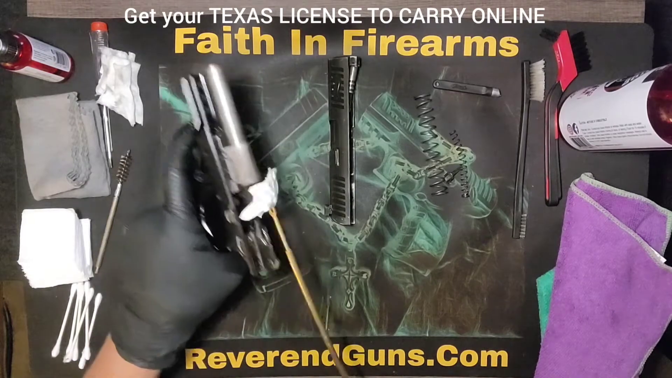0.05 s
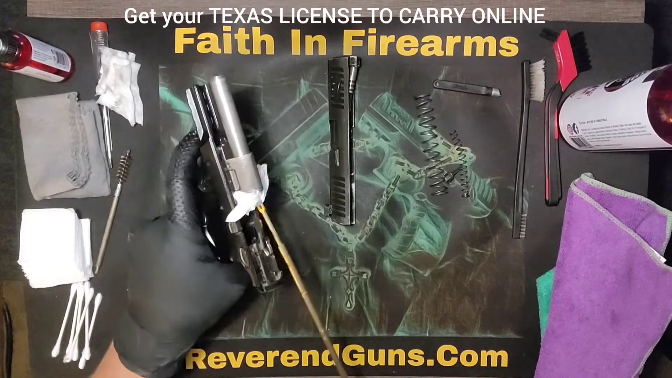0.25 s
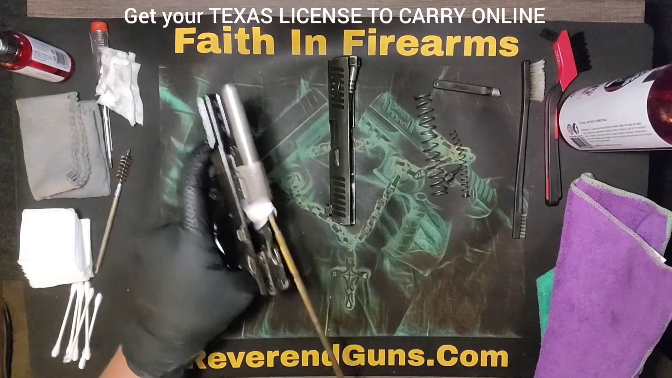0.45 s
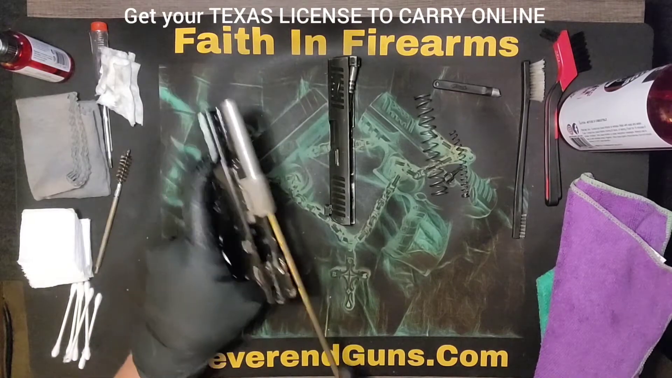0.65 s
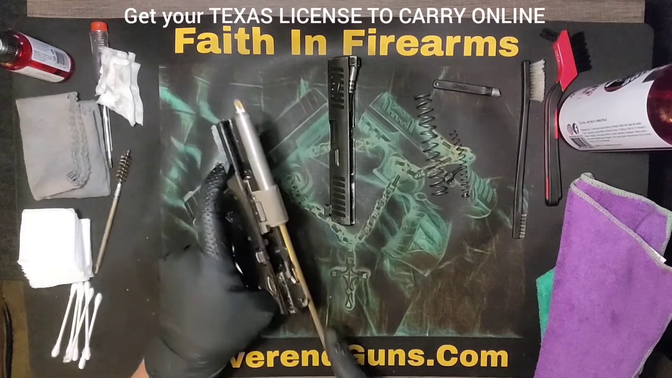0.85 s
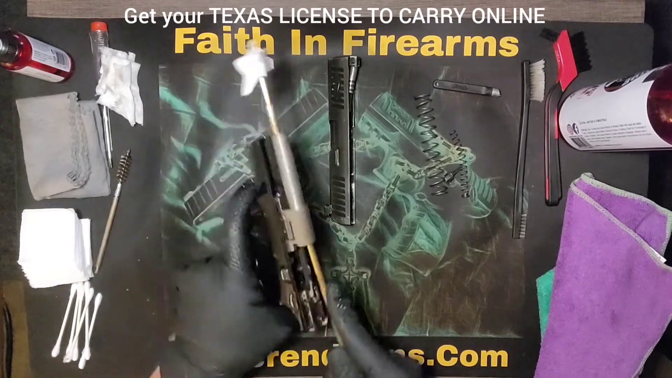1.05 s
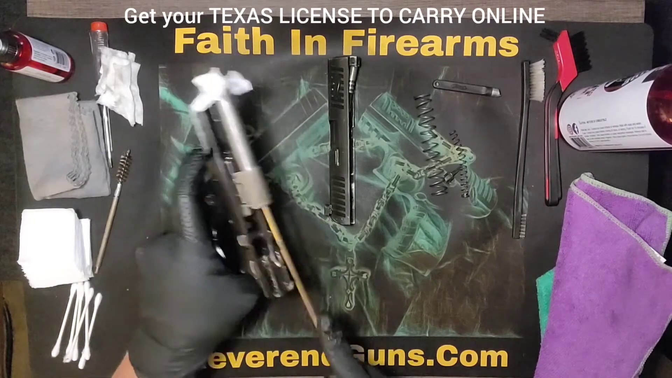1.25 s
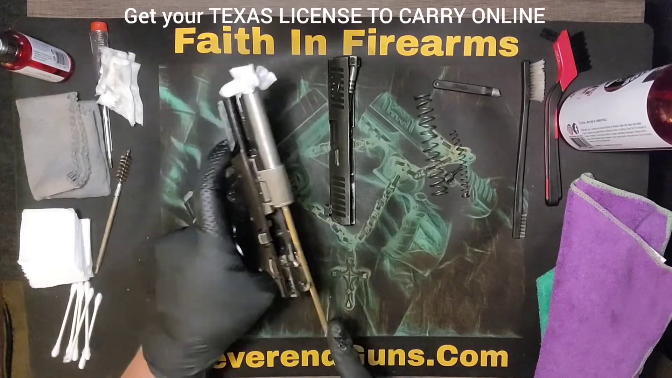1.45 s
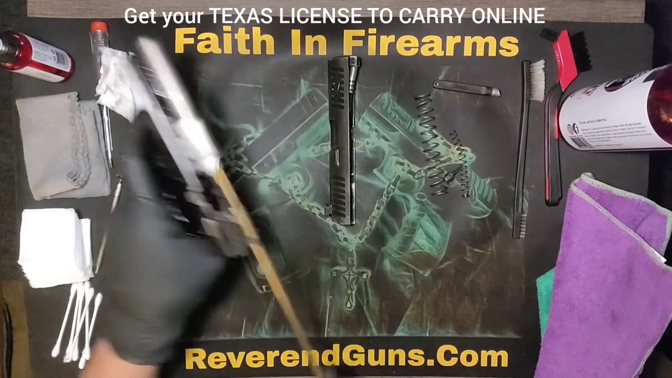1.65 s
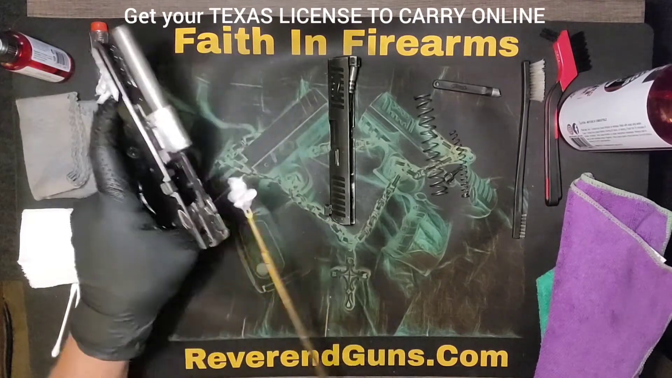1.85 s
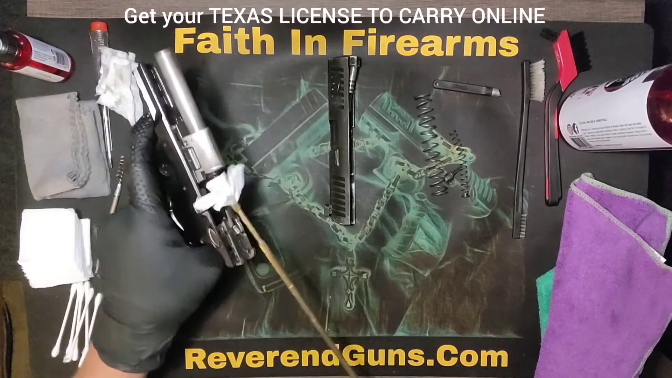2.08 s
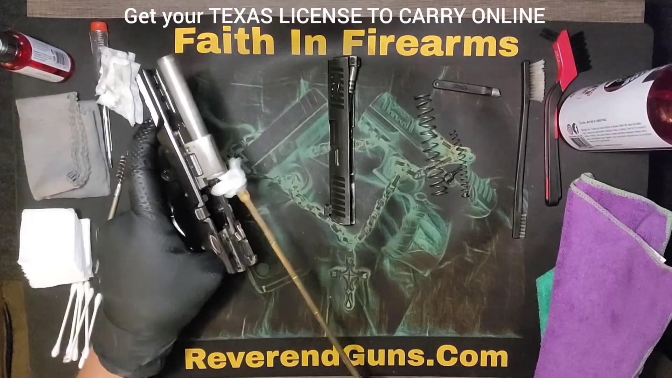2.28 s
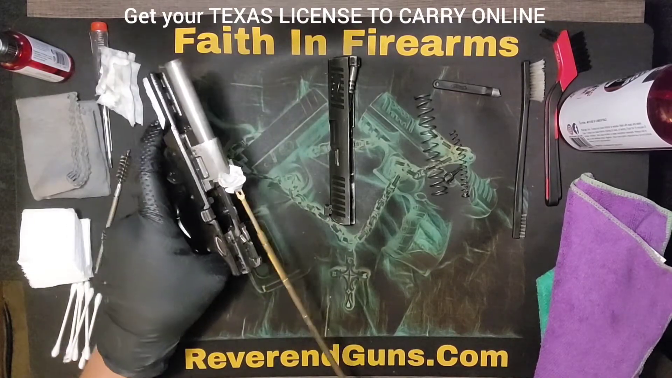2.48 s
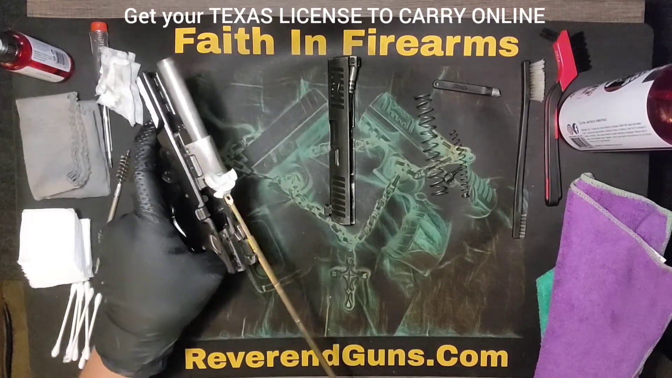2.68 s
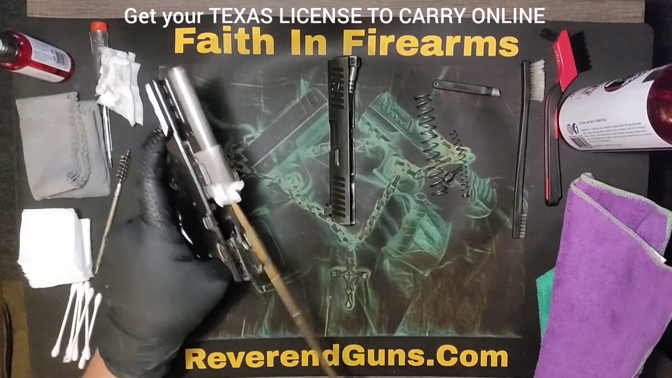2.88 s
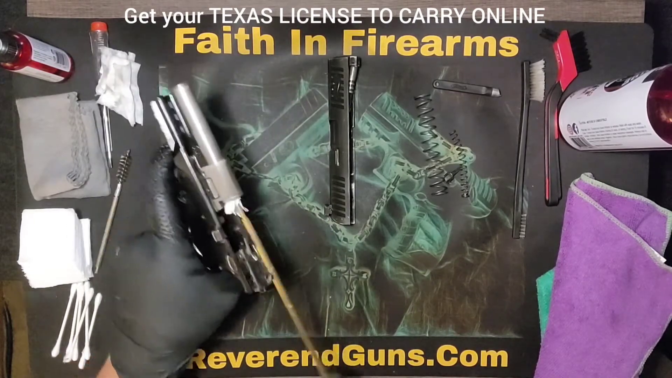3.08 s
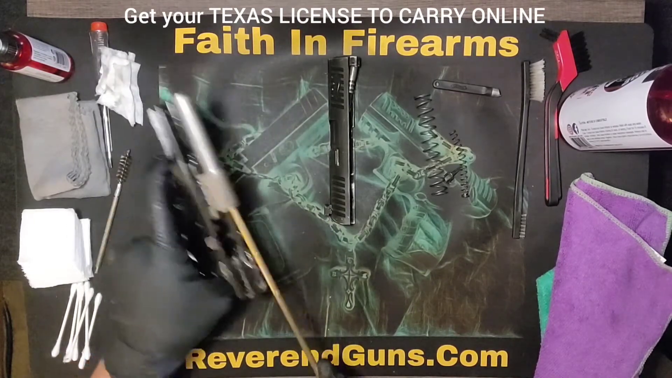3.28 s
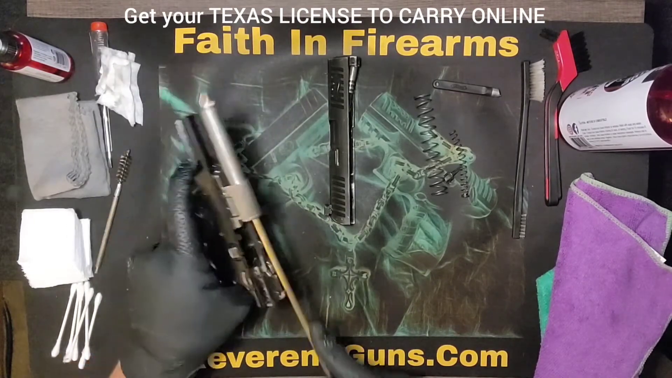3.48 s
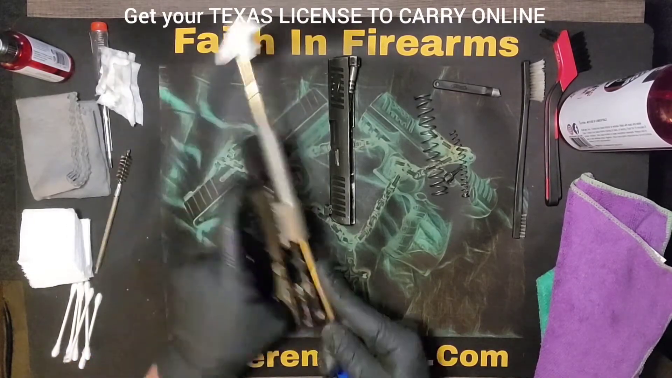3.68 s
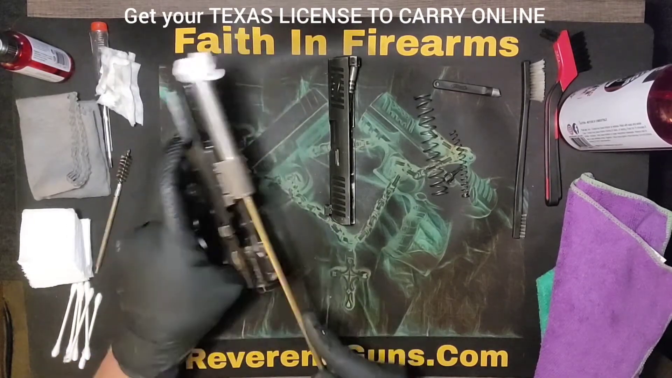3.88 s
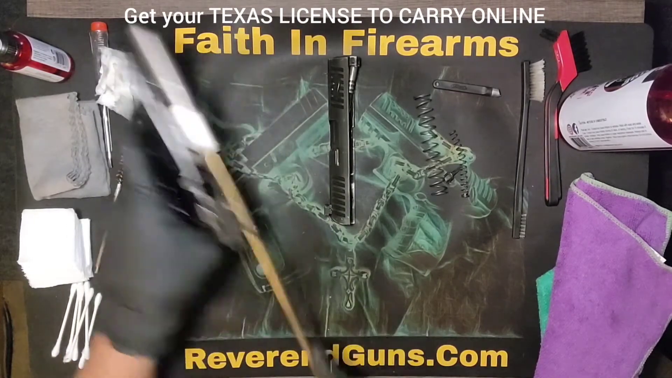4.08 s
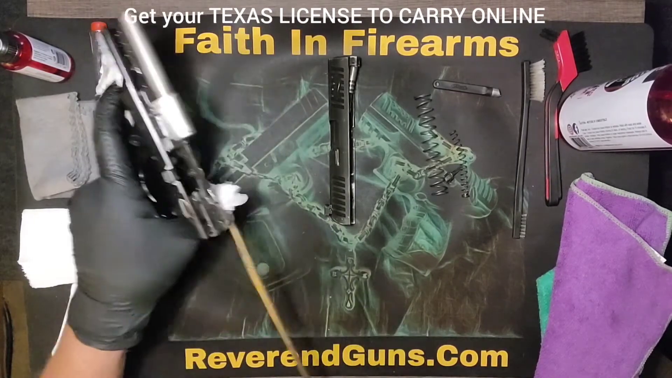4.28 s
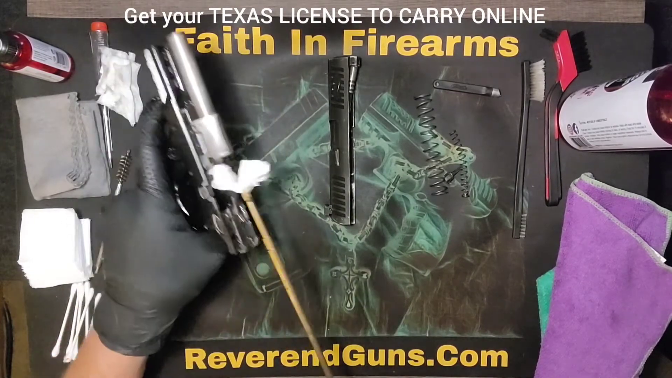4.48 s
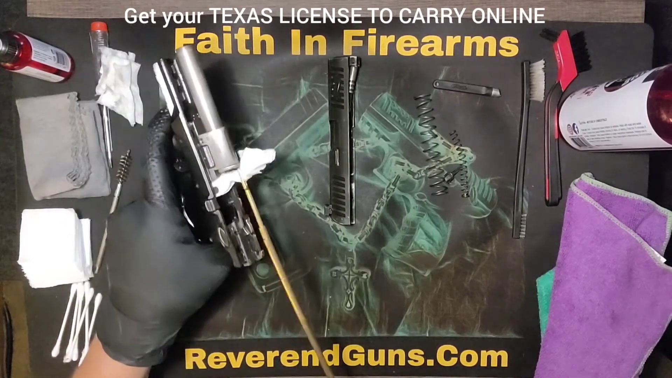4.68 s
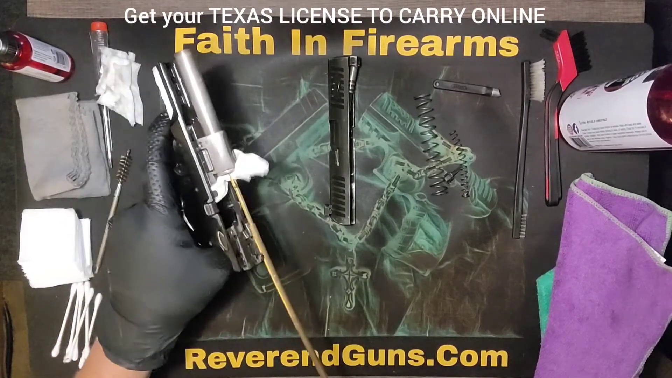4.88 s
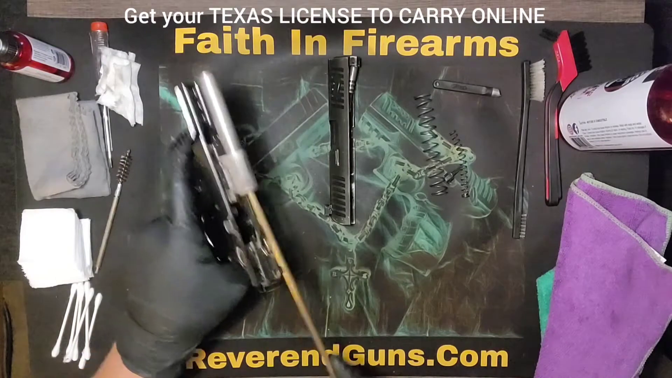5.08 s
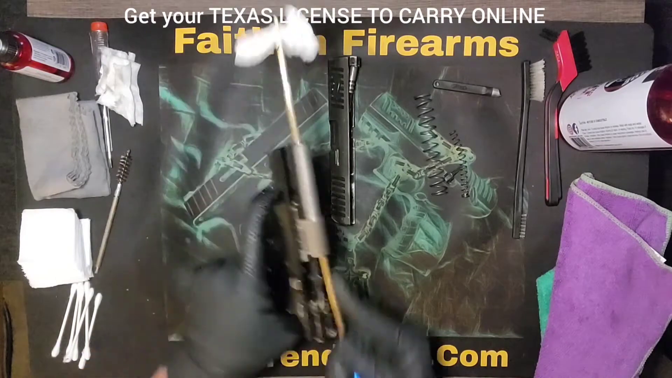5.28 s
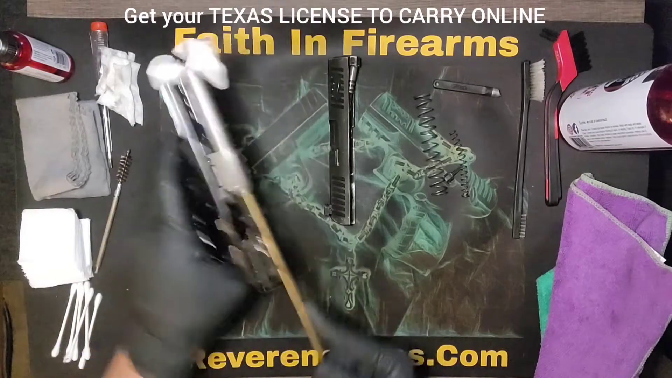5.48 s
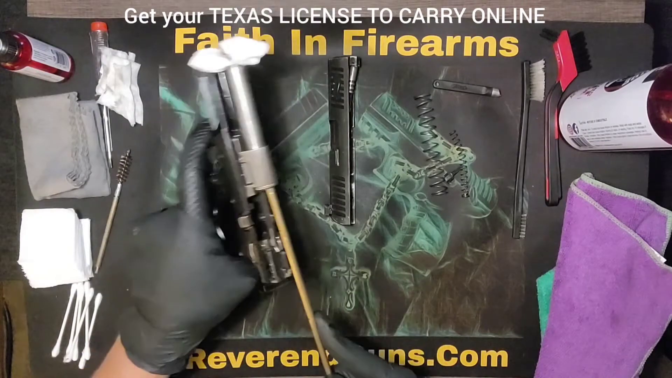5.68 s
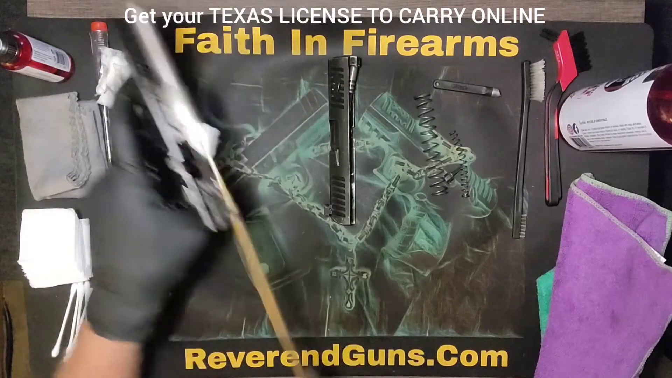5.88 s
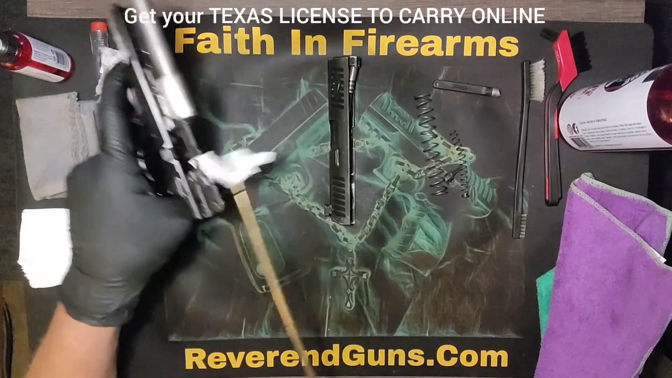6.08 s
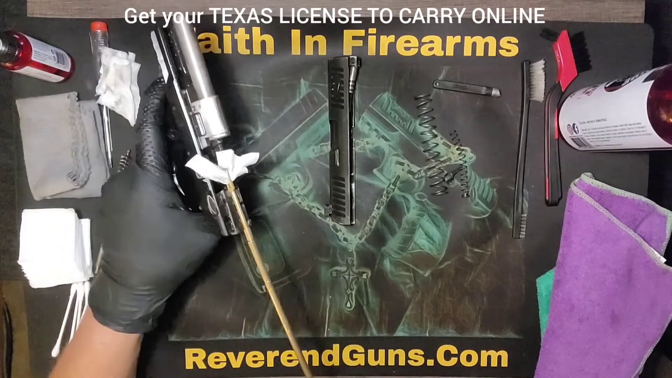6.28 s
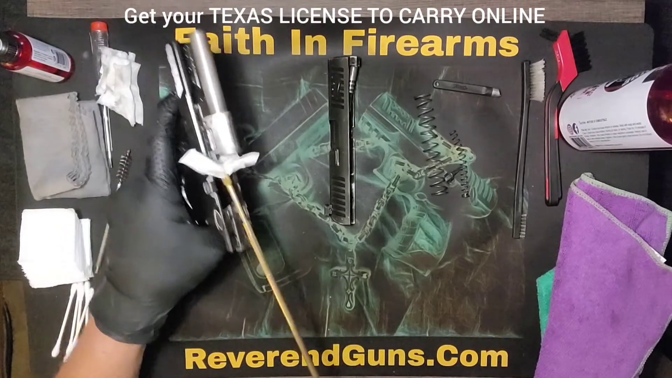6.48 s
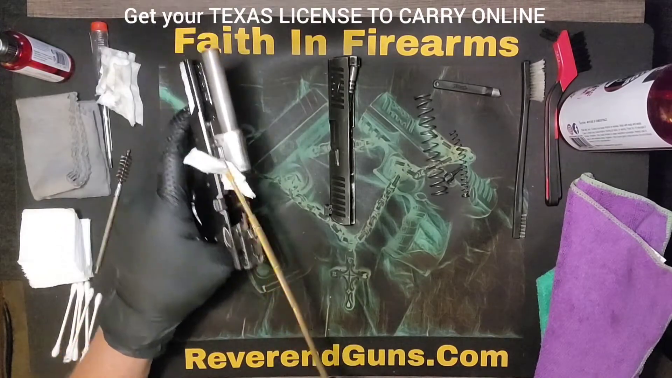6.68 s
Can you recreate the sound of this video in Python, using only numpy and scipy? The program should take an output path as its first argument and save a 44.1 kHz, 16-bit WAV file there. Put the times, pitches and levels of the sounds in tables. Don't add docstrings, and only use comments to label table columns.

```python
import sys
import numpy as np
from scipy import signal
from scipy.fft import rfft, irfft, next_fast_len
from scipy.io import wavfile
from scipy.ndimage import map_coordinates

SR = 44100
rng = np.random.default_rng(int(sys.argv[2]) if len(sys.argv) > 2 else 0)


def natural_amplitude(level_db):
    exponent = np.asarray(level_db, float) / 20
    return 10 ** exponent


def file_out(sig):
    cols = np.atleast_2d(sig).T
    lim = np.clip(cols, -1, 1)
    pcm = np.round(lim * 32767).astype(np.int16)
    wavfile.write(sys.argv[1], SR, pcm)


N = 297234

# [f/Hz, level/dB]
STEEL_MODES = [(800, -24), (1150, -30), (1500, -10), (1940, -0.5), (2300, -8.5), (2740, 1), (3100, 1),
               (3450, 3.5), (3770, 1), (4200, -2.5), (4450, -7), (4750, -9.5)]
# [f/Hz, level/dB]
ROD_MODES = [(5200, -18.5), (5640, -9.5), (6080, -10.5), (6880, -9.5), (7770, -10.5), (8800, -20)]
# [f/Hz, level/dB]
CLOTH_MODES = [(10200, -16.5), (12000, -6.5), (12900, 1.5), (14200, -2), (15300, -11.5)]
SHARPNESS = (18, 16, 12)


def unit(x):
    return x / np.sqrt(np.mean(x ** 2) + 1e-20)


def along(points, hz):
    f, v = np.transpose(points)
    return np.interp(np.log(hz + 1), np.log(f + 1), v)


def wobble(rate):
    steps = np.arange(0, N * rate / SR + 1, 1 / 8)
    knots = rng.standard_normal(int(N * rate / SR) + 4)
    curve = map_coordinates(knots, [steps])
    return np.interp(np.arange(N) * rate / SR, steps, curve)


def filtered(x, response):
    n = x.shape[-1]
    m = next_fast_len(n + 1024)
    return irfft(rfft(x, m) * response(np.fft.rfftfreq(m, 1 / SR)), m)[..., :n]


def rush(spectrum):
    # [f/Hz, left-right likeness]
    likeness = [(60, .9), (150, .9), (280, .45), (640, 0), (7000, .2), (15000, .6)]
    turn = lambda hz: np.arccos(np.clip(along(likeness, hz), -1, 1)) / 2
    shape = lambda hz: natural_amplitude(along(spectrum, hz)) * [np.cos(turn(hz)), np.sin(turn(hz))]
    mid, side = filtered(rng.standard_normal((2, N)), shape)
    return unit(np.array([mid + side, mid - side]))


def background():
    # [f/Hz, rms level/dB, unsteadiness/dB]
    hum_lines = [(18, -75, 3), (29.2, -60, .4), (58, -75, 3.5), (77.6, -69, 1.6), (119.8, -70, 1.3),
                 (178, -86, 3), (238, -89, 2), (296, -94, 2), (358, -95, 2)]
    # [f/Hz, level per Hz/dB]
    rumble = [(12, -18.5), (22, -6), (50, -3.5), (100, -4.5), (170, -13), (260, -20.5), (450, -23),
              (800, -22), (1100, -33)]
    # [f/Hz, level per Hz/dB]
    far_hiss = [(590, -33.5), (1000, -9), (1250, -2), (1860, -3), (2020, 0.5), (2870, 1.5), (3350, -2.5),
                (4380, -8.5), (8260, -22.5), (15200, -15), (16500, -23.5)]
    t = np.arange(N) / SR
    hum = 0
    for hz, db, shake_db in hum_lines:
        strength = np.sqrt(2) * natural_amplitude(db + shake_db * wobble(4.8))
        port_phase = [[0], [.35]]
        phase = 2 * np.pi * hz * t + 0.47 * shake_db * wobble(2.4) + port_phase
        hum = hum + strength * np.sin(phase)
    hum = hum * natural_amplitude([[-.4], [.4]])
    return hum + natural_amplitude(-70.5) * rush(rumble + [(1600, -74.5)]) + natural_amplitude(-81) * rush(far_hiss)


def damped(hz, sharpness):
    return sharpness * min(1, (hz / 1900) ** 2)


def resonance(x, hz, db, sharpness):
    sharp = signal.iirpeak(hz, sharpness, SR)
    wide = signal.iirpeak(hz, sharpness / 4, SR)
    return natural_amplitude(db) * signal.lfilter(*wide, signal.lfilter(*sharp, x))


def stroke():
    # [t/s, steel level/dB, time to lose 30 dB/s, spot f/Hz, rod over steel/dB]
    jolts = [(.678, -48.5, 0.0572, 3400, -6.5), (.996, -48, 0.1477, 2805, -7.5),
             (1.466, -57, 0.1142, 4144, -3.5), (3.47, -63, 0.98, 2100, -17.5),
             (4.998, -57.5, 0.11, 2001, -8), (3.7, -52, 0.1655, 3695, -15.5),
             (4.033, -41.5, 0.0345, 4297, -3.5), (3.22, -59.5, 0.15, 3523, -10),
             (3.302, -41, 0.1413, 4121, -18.5), (3.566, -39.5, 0.1005, 4060, -2),
             (4.055, -34, 0.0217, 4130, 7.5), (4.098, -28.5, 0.0325, 3450, -9.5),
             (4.182, -43, 0.017, 3693, -7.5), (4.694, -49, 0.0991, 3880, -11),
             (5.152, -49.5, 0.2553, 4028, -9.5), (5.24, -38, 0.0405, 2982, -12),
             (5.372, -43, 0.0159, 2677, -18.5), (5.719, -56.5, 0.0655, 3983, -12.5),
             (5.785, -32, 0.0825, 4080, -5.5), (6.26, -59.5, 0.0316, 2582, -7),
             (6.374, -68, 0.13, 3189, -8), (6.486, -66, 0.0021, 2649, -3)]
    # [middle t/s, steel level/dB, time to lose 30 dB/s, spot f/Hz, rod over steel/dB]
    slides = [(.78, -68, 0.18, 1950, -16.5), (.975, -51.5, 0.0788, 2600, -10),
              (1.145, -44.5, 0.06, 3000, -13), (1.205, -43, 0.0429, 2705, -12),
              (1.595, -42.5, 0.0722, 4291, -8.5), (1.66, -42.5, 0.1105, 4268, -16),
              (2.45, -75, 0.0033, 3858, -13.5), (2.65, -76.5, 0.1, 3850, -14),
              (3.545, -44.5, 0.023, 3011, -8.5), (3.64, -57, 0.0672, 3892, -12),
              (3.785, -42, 0.0997, 2972, -20.5), (1.11, -50, 0.0338, 2300, -20.5),
              (4.04, -53, 0.0382, 3488, -8), (4.13, -47, 0.1128, 3882, -12), (4.44, -74, 0.27, 3863, -16),
              (4.775, -62.5, 0.0943, 3601, -15.5), (5.185, -38, 0.0276, 3303, -19.5),
              (5.29, -43, 0.0427, 4311, -14), (5.44, -40, 0.078, 2522, -13.5),
              (5.494, -41.5, 0.0555, 2705, -18), (5.6, -69.5, -0.04, 2721, -17),
              (5.89, -45, 0.0896, 3800, -9), (6.415, -62.5, 0.05, 2733, -18.5),
              (6.595, -65, 0.0678, 2670, -21)]
    # [middle t/s, cloth level/dB, time to lose 30 dB/s, spot f/Hz]
    brushes = [(.465, -67.5, 0.0751, 2000), (.655, -66, 0.0938, 3000), (1.011, -52, 0.0283, 2840),
               (1.189, -48, 0.0143, 2690), (2.897, -72, 0.03, 5188), (3.035, -63, 0.0484, 5300),
               (3.235, -70, 0.0176, 3530), (3.54, -58, -0.0086, 3700), (3.57, -46, 0.0156, 4044),
               (3.76, -55, 0.0251, 3107), (4.032, -58.5, 0.0172, 4300), (5.0, -62.5, 0.075, 1999),
               (5.09, -70.5, 0.1418, 5200), (5.237, -38, 0.0035, 2975), (5.446, -53, 0.0429, 2517),
               (5.768, -63.5, -0.0351, 2733), (6.4, -72, -0.02, 2736), (6.49, -62.5, 0.0044, 2650),
               (6.67, -85, 0.14, 3600)]
    # [steel level/dB, rod level/dB, cloth level/dB]
    brush_parts_db = (-7.5, -4, -1.5)
    # [steel level/dB, rod level/dB, cloth level/dB]
    rest_parts_db = (-84.5, -93.5, -96)
    rise_s = .016
    cloth_equal_db, cloth_grows = -77.5, 0.723
    settle_s, settle_db = 0.22, (-28.5, -24, -22)
    t = np.arange(0, N / SR + .002, .001)

    def jolt(s, fall_s):
        return -30 * np.where(t < s, (s - t) / rise_s, (t - s) / fall_s)

    def swell(s, fall_s, order=2):
        return -30 * ((t - s) / fall_s) ** order

    def tight(db, rod_db):
        cloth_db = rod_db - (1 - cloth_grows) * (db + rod_db - cloth_equal_db)
        return 0, rod_db, cloth_db

    moves = [(db + jolt(s, fall), hz, tight(db, rod)) for s, db, fall, hz, rod in jolts]
    moves += [(db + swell(s, fall), hz, tight(db, rod)) for s, db, fall, hz, rod in slides]
    moves += [(db + swell(s, fall, order=4), hz, brush_parts_db) for s, db, fall, hz in brushes]
    moves += [(0 * t, 2750, rest_parts_db)]
    power = np.array([natural_amplitude(2 * (db + np.array(parts_db)[:, None])) for db, _, parts_db in moves])
    total = power.sum(0)
    spot_hz = np.exp(np.log([hz for _, hz, _ in moves]) @ power[:, 0] / total[0])
    memory = natural_amplitude(-60 * t[1] / settle_s)
    creep = natural_amplitude(2 * np.array(settle_db))[:, None] * signal.lfilter([1 - memory], [1, -memory], total)
    curves = (*10 * np.log10(total + creep), spot_hz)
    return [np.interp(np.arange(N) / SR, t, curve) for curve in curves]


def scrape():
    grip_drift = (3.5, 3, 2)
    clumping = (1.3, 1.1, .75)
    spot_lift = (9, 7, 0)
    *levels, spot_hz = stroke()
    clumps_db = 11 * np.tanh((2.1 * wobble(80) + 5 * wobble(700)) / 10)
    parts = zip((STEEL_MODES, ROD_MODES, CLOTH_MODES), levels, clumping, grip_drift, spot_lift, SHARPNESS)
    out = np.zeros((2, N))
    for modes, level_db, grainy, drift_db, focus_db, sharp in parts:
        common, other = rng.standard_normal((2, N))
        fibres = common + .4 * other * [[1], [-1]]
        fibres = natural_amplitude(grainy * clumps_db) * fibres
        layer = 0
        for hz, db in modes:
            nearness = np.exp(-(np.log(spot_hz / hz) / .07) ** 2)
            grip_db = drift_db * wobble(30) + focus_db * nearness
            layer = layer + resonance(natural_amplitude(grip_db) * fibres, hz, db, damped(hz, sharp))
        out += unit(layer) * natural_amplitude(level_db + 0.5)
    return out


def singing(rows, width_hz):
    out, t = np.zeros(N + SR), np.arange(SR // 6) / SR
    memory = np.exp(-np.pi * abs(width_hz) / SR)
    slow = np.convolve([1, -memory], [1, -memory])
    for s, length, from_hz, to_hz, db in rows:
        u = np.clip(t / max(length, .01), 0, 1)
        a, b = unit(signal.lfilter([1], slow, rng.standard_normal((2, len(t)))))
        phase = 2 * np.pi * np.cumsum(from_hz + (to_hz - from_hz) * u) / SR
        swell = np.sqrt(np.abs(np.sin(np.pi * u))) * (u < 1)
        out[round(s * SR):][:len(t)] += natural_amplitude(db) * swell * (a * np.cos(phase) + b * np.sin(phase))
    return out[:N]


def thuds():
    # [t/s, length/s, from f/Hz, to f/Hz, rms level/dB]
    bench_thuds = [
        (.42, 0.077, 310.5, 301, -78.5),
        (.665, 0.027, 603, 560, -74.5),
        (2.42, .1, 329.6, 309, -80.5),
        (3.29, 0.0692, 370, 330, -77),
        (4.045, .05, 300, 260, -77),
        (4.16, 0.0483, 340.3, 330, -77.5),
        (4.95, .12, 220, 220, -78),
        (5.775, .04, 330, 280, -79),
    ]
    return singing(bench_thuds, 90) * natural_amplitude([[.5], [-.5]])


def contacts():
    # [t/s, peak level/dB, f/Hz]
    notes_sung = [(.399, -57.5, 1487), (.96, -60.5, 961), (1.2, -52, 849), (1.642, -51, 797.3),
                  (3.025, -62, 5434), (3.803, -53, 826), (4.093, -46, 800), (4.177, -42, 1928),
                  (5.232, -35, 1976), (4.705, -53, 1954), (5.925, -46, 1994), (5.232, -48.5, 843),
                  (5.497, -56, 810), (5.776, -55, 799.5), (5.895, -55, 800), (1.105, -64.5, 928),
                  (3.33, -53.5, 1356)]
    # [t/s, peak level/dB, loudest f/Hz, edge/dB]
    ticks = [(0.421, -38, 2007, -8.5), (0.7374, -47.5, 2240, -11), (0.8673, -48, 4313, -27.5),
             (1.4544, -43.5, 6800, -16), (1.507, -45.5, 4010, -30.5), (2.4416, -60, 3810, -31),
             (2.569, -66, 3840, -25), (2.897, -63, 3000, -9), (3.1121, -56, 2640, -9.5),
             (3.213, -51, 3490, -7), (4.7473, -43, 2003, -11), (5.649, -44, 3620, -31),
             (5.723, -63, 3530, -15), (6.177, -52.5, 3760, -25.5), (6.2565, -51.5, 7740, -6.5),
             (6.3754, -44.5, 2726, -11.5), (6.4043, -48.5, 3810, -6.5), (3.486, -54.5, 3315, -17.5),
             (3.655, -47.5, 3850, -17), (3.895, -48.5, 4320, -25.5), (5.003, -53, 2008, -14),
             (5.56, -55, 3976, -2), (6.603, -55, 2700, -13.5), (6.4802, -54, 2994, -4.5),
             (0.9296, -56, 2530, -17.5), (3.5083, -53, 2670, -17.5), (3.694, -47.5, 3950, -20.5),
             (1.793, -60.5, 3500, -9)]
    # [t/s, peak level/dB, loudest f/Hz, edge/dB, body/dB]
    blows = [(0.6738, -26.5, 3670, -3, -21), (1.2139, -27, 4523, -5.5, -11), (1.464, -29, 4480, -6, -28),
             (1.6372, -23, 3560, -9, -16.5), (3.326, -27, 4177, -10.5, -10.5),
             (3.5615, -19.5, 4106, -5.5, -22), (3.7487, -31.5, 4700, -2.5, -7.5),
             (3.8079, -34.5, 3460, -25.5, -5), (4.0912, -23, 4420, -8, -14),
             (4.098, -24.5, 4550, -20, -8.5), (4.1778, -26.5, 3730, -13, -19),
             (4.6918, -35, 4750, -7.5, -15.5), (5.1484, -38, 4276, -6, -19),
             (5.4994, -32, 2608, -11.5, -13), (5.7783, -15.5, 3695, -2, -22),
             (5.7995, -23, 4110, -21.5, -30.5), (6.4868, -40, 2712, -1.5, -15)]
    # [t/s, peak level/dB, loudest f/Hz, edge/dB, body/dB]
    shoves = [
        (0.9888, -25.5, 2810, -5, -12),
        (1.5934, -24, 4326, -9, -18.5),
        (3.2975, -29.5, 4270, -21.5, -20),
        (4.0497, -12, 4255, -3, -22),
        (5.2322, -19, 4190, -6, -17.5),
        (5.365, -26.5, 2666, -19, -25.5),
        (5.479, -24, 2840, -10, -20),
        (1.2, -28, 2792, -16.5, -12.5),
    ]
    # [t/s, peak level/dB, loudest f/Hz, edge/dB]
    rattles = [(1.009, -31.5, 2940, -28.5), (1.077, -39, 3266, -30), (1.1455, -31, 3140, -10),
               (1.187, -31, 4040, -14.5), (1.2386, -47.5, 1600, -18.5), (1.5455, -41, 3970, -20),
               (1.5631, -31.5, 3820, -14), (1.586, -26.5, 4120, -20.5), (1.602, -36, 4570, -14.5),
               (1.6169, -31, 4000, -30), (1.6448, -23, 4300, -13), (1.7238, -38.5, 3790, -20.5),
               (3.5373, -28, 3317, -7.5), (3.7627, -32, 4254, -15), (3.7803, -35, 3220, -28),
               (3.8326, -44.5, 2990, -12.5), (3.87, -41, 2993, -25), (4.1405, -36, 3650, -14),
               (5.1839, -28, 2640, -23.5), (5.193, -30.5, 4420, -4), (5.2996, -29.5, 2788, -34.5),
               (5.427, -36.5, 5940, -16.5), (5.4432, -32, 6490, -9.5), (5.452, -38.5, 5040, -7),
               (5.1557, -41, 4180, -20), (5.8563, -36, 3720, -20), (5.876, -30, 3824, -11.5),
               (5.9186, -42, 2010, -14), (5.9355, -33.5, 3790, -12.5), (.9503, -44.5, 2550, -15),
               (.996, -34, 2810, -13.5), (1.1209, -36.5, 2710, -16), (1.127, -36, 2782, -11),
               (1.194, -33, 2784, -15), (1.698, -42, 3490, -5.5), (3.8, -37, 4100, -18),
               (5.47, -38, 2698, -12), (5.898, -39.5, 2000, -10.5), (5.906, -40, 3800, -8)]
    strike_lift_db = 6
    hits = [(*row, .8, strike_lift_db, 1) for row in blows]
    hits += [(*row, -24.5, 2, strike_lift_db, 1) for row in rattles]
    hits += [(*row, -26, 1.3, 2.5, 1.4) for row in ticks]
    hits += [(*row, -16, -16, 7.5, 24, 1) for row in notes_sung]
    hits += [(*row, 1.3, strike_lift_db, 1) for row in shoves]
    return hits


def ringing(modes, extra_db=0):
    c, w, db = np.transpose(modes)[:, :, None]
    gain = natural_amplitude(db + extra_db) * (-1.) ** np.arange(len(modes))[:, None]
    return lambda f: np.sum(gain * 1j * f * w / (c * c - f * f + 1j * f * w), axis=0)


def knocks():
    out, t = np.zeros((2, N + SR)), np.arange(1500) / SR
    modes = []
    for part, sharp in zip((STEEL_MODES, ROD_MODES, CLOTH_MODES), SHARPNESS):
        modes += [(hz, hz / damped(hz, sharp), db) for hz, db in part]
    modes = np.array(modes)
    centre = modes[:, :1]
    is_edge, is_body = centre > 4800, centre < 2200
    for s, db, hz, edge_db, body_db, ms, lift_db, damping in contacts():
        u = 1000 * t / np.clip(ms, .4, 8)
        common, other = rng.standard_normal((2, len(t)))
        chatter = common + .3 * other * [[1], [-1]]
        contact = chatter * u * np.exp(-1.2 * u)
        blunt = natural_amplitude(min(edge_db + 8, 0))
        contact = filtered(contact, lambda f: (6000 + blunt * 1j * f) / (6000 + 1j * f))
        strength, shift = rng.standard_normal((2, len(modes), 1))
        colour_db = 2.2 * strength + is_edge * (edge_db + 7) - (centre > 9500) * 13
        colour_db = colour_db + is_body * (body_db + 16)
        held = modes * [1, damping, 1] * np.exp(shift * [.03, .03, 0])
        loudest = [(hz, damping * max(hz / 15, 90), lift_db)]
        ring = filtered(contact, ringing(held, colour_db)) + filtered(contact, ringing(loudest))
        out[:, round(s * SR):][:, :len(t)] += natural_amplitude(db + 4.5) * ring / np.max(np.abs(ring))
    return out[:, :N]


def whistles():
    # [t/s, length/s, from f/Hz, to f/Hz, rms level/dB]
    bore_whistles = [(.76, 0.0564, 1950, 1950, -69), (1.0, 0.0653, 3000, 2600, -56),
                     (1.095, .08, 2200, 3450, -46.5), (1.63, 0.0533, 1949, 1930, -45),
                     (2.877, 0.0325, 1470, 1464, -67), (2.91, .045, 1980, 1980, -76.5),
                     (3.56, 0.074, 4502, 3700, -46.5), (3.69, 0.067, 4755, 4750, -59),
                     (3.76, 0.035, 3000, 3050, -50), (4.71, 0.077, 1950, 1950, -62.5),
                     (5.165, .02, 3350, 3350, -48), (5.24, .07, 4604, 3800, -50),
                     (5.79, 0.049, 2750, 2750, -46), (5.79, 0.058, 4116, 3800, -45.5),
                     (5.85, .05, 3800, 3800, -53.5), (6.41, 0.051, 3880, 3900, -69),
                     (6.5, 0.066, 2700, 2700, -71.5), (1.645, 0.0674, 4350, 4197, -45),
                     (1.55, .05, 4000, 4396, -49.5), (1.215, 0.0497, 2800, 2655, -51),
                     (4.93, 0.042, 1100, 1393, -71.5), (4.93, .15, 5000, 5400, -72),
                     (3.015, .035, 5300, 5600, -69), (2.41, .06, 3850, 3850, -80),
                     (2.56, .05, 3850, 3800, -81), (4.42, .06, 3900, 3850, -79)]
    return singing(bore_whistles, 220)


def ports(x):
    # [f/Hz, phase/rad]
    left_lead = [(0, 0), (700, 1), (1460, 1.5), (2000, 1.3), (2750, 2.2), (3500, 3.2), (4100, 4.7),
                 (5500, 6), (7000, 6.9), (16500, 7.6)]
    # [f/Hz, level/dB]
    left_louder = [(700, 4), (1300, 1), (2400, 2), (4400, 1.5), (8000, 1.73), (15000, .5)]
    # [f/Hz, level/dB, relative width]
    dip_hz, dip_depth_db, dip_width = (9800, -4.5, .11)
    f, lead = np.transpose(left_lead)
    half = np.array([[.5], [-.5]])

    def response(hz):
        small = (1j * hz / (700 + 1j * hz)) ** 2
        dip_db = dip_depth_db * np.exp(-((hz / dip_hz - 1) / dip_width) ** 2)
        loudness = natural_amplitude(half * along(left_louder, hz) + dip_db)
        return small * loudness * np.exp(1j * half * np.interp(hz, f, lead))

    return filtered(x, response)


def room(x):
    # [f/Hz, t/s]
    decay_times = [(500, .1), (2000, 0.15), (4000, .19), (10000, .1)]
    # [delay t/s, level/dB]
    near_walls = [
        (.0065, -17),
        (.0088, -18),
        (.014, -23),
        (.019, -18),
    ]
    hz, t, z = signal.stft(rng.standard_normal((2, SR // 2)), SR, nperseg=256)
    fade = natural_amplitude(-60 * t / along(decay_times, hz)[:, None])
    tail = signal.istft(z * fade, SR, nperseg=256)[1]
    delayed = np.pad(x, ((0, 0), (200, 0)))
    late = signal.fftconvolve(delayed, tail / np.linalg.norm(tail[0]), axes=1)[:, :N]
    early = 0
    for k, (s, db) in enumerate(near_walls):
        sides = x[::(-1) ** k]
        early = early + natural_amplitude(db) * np.roll(sides, round(s * SR), axis=1)
    return early + natural_amplitude(-11) * late


def scene():
    work = ports(scrape() + knocks() + whistles())
    return background() + thuds() + work + room(work)


def low_pass(x):
    return signal.sosfilt(signal.butter(12, 16980, fs=SR, output="sos"), x)


def record(dry):
    def band(hz):
        return np.maximum(1 / (1 + (hz / 15850) ** 150), natural_amplitude(-22) * (hz < 16700))

    return low_pass(filtered(dry, band))


dry = scene()
out = record(dry)
file_out(out)
```